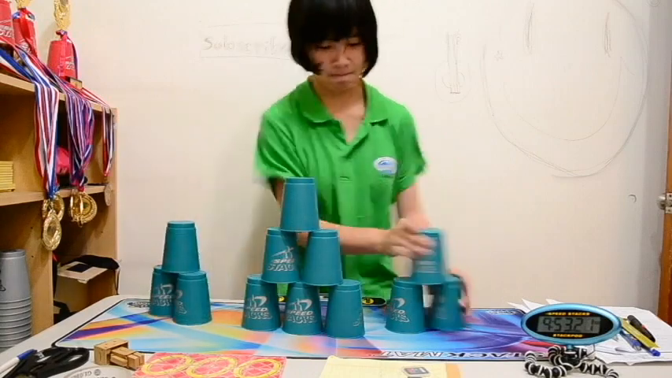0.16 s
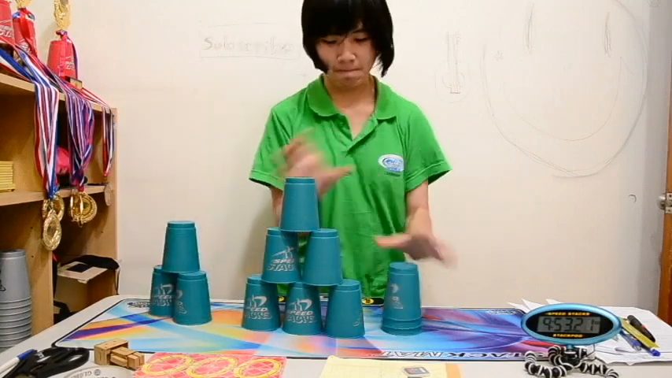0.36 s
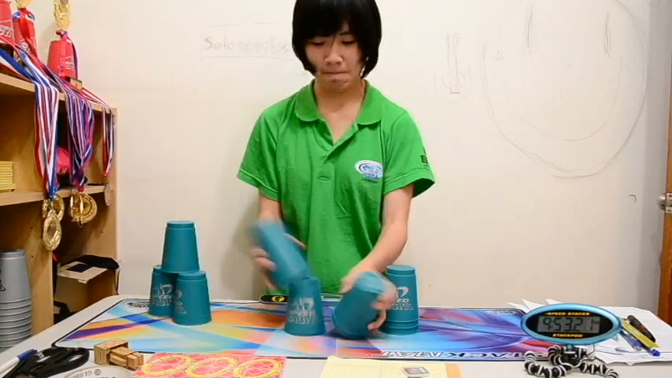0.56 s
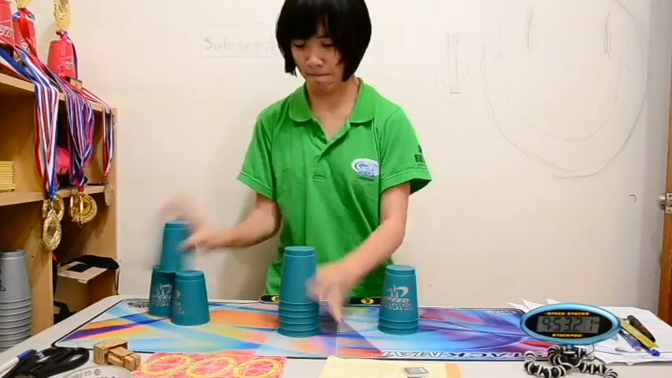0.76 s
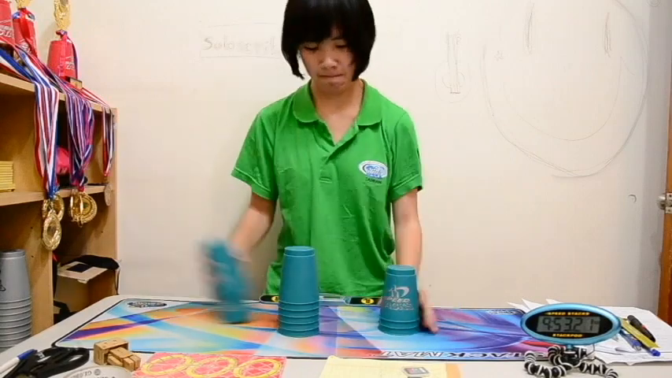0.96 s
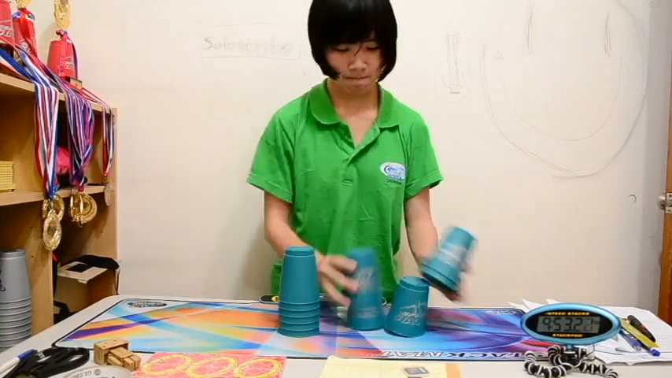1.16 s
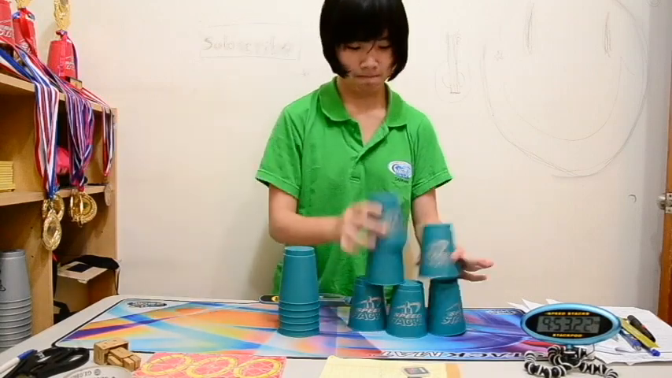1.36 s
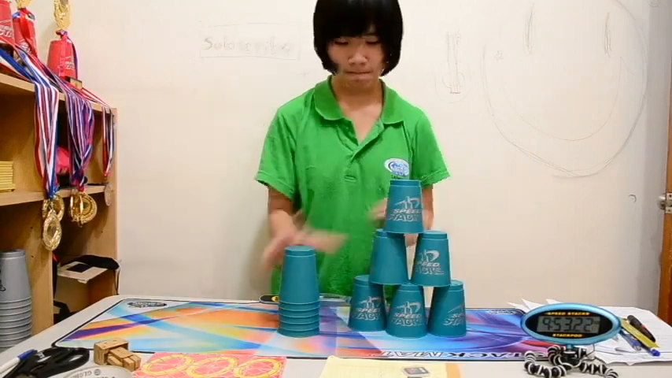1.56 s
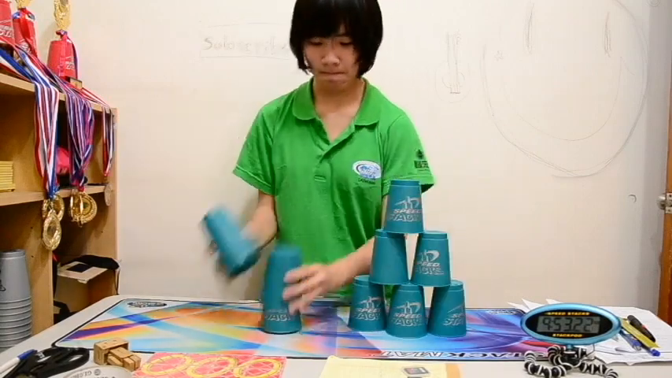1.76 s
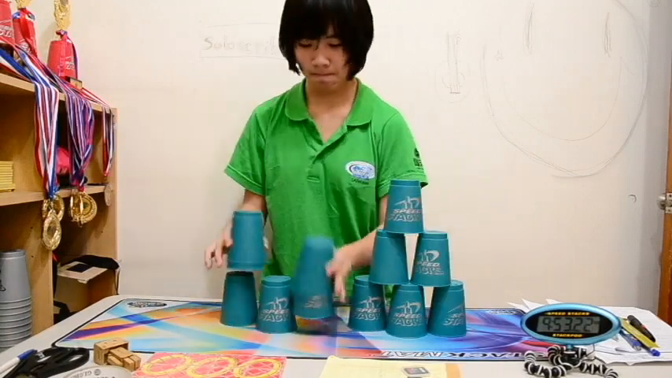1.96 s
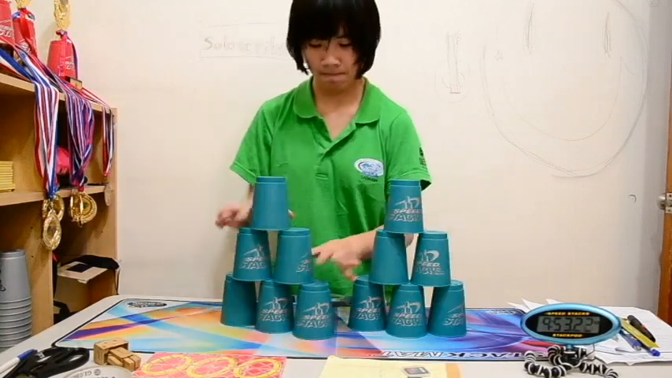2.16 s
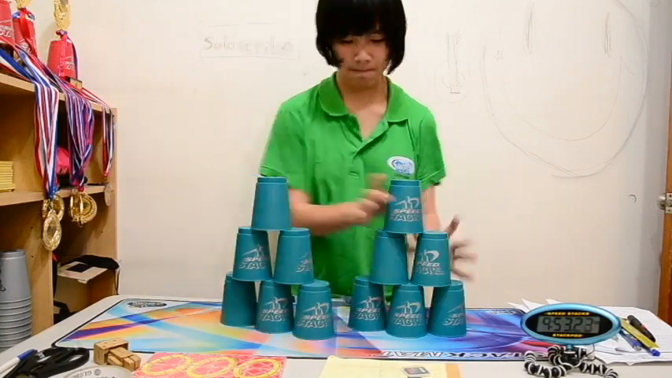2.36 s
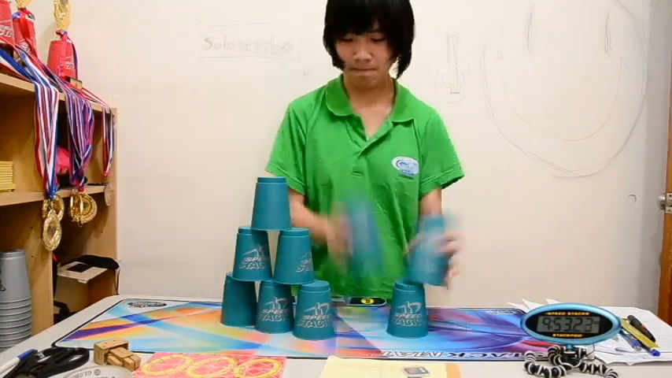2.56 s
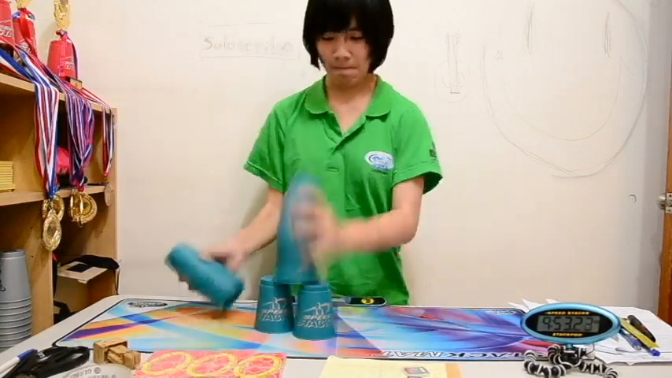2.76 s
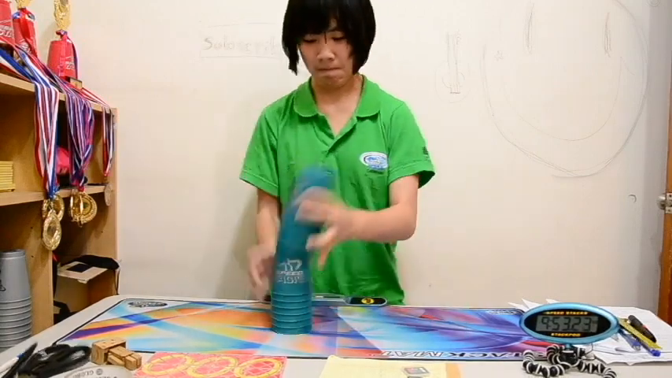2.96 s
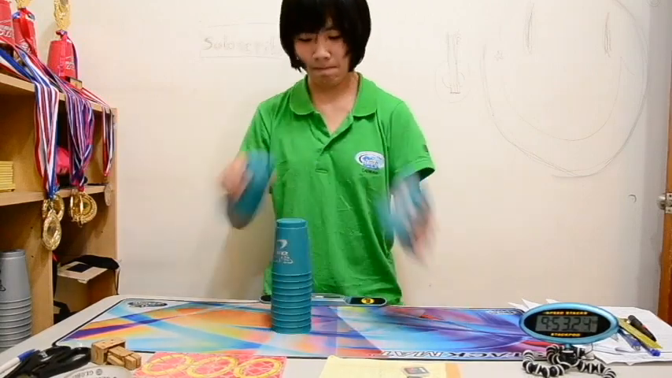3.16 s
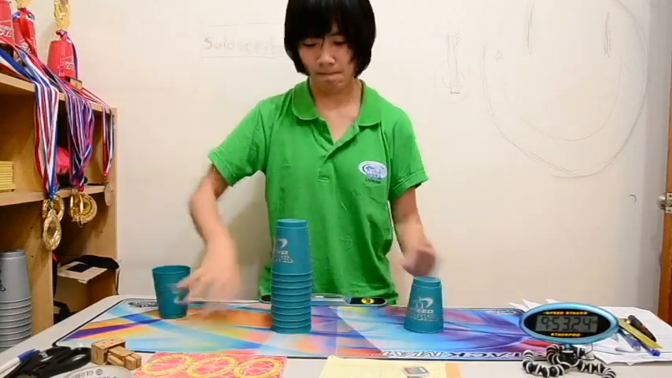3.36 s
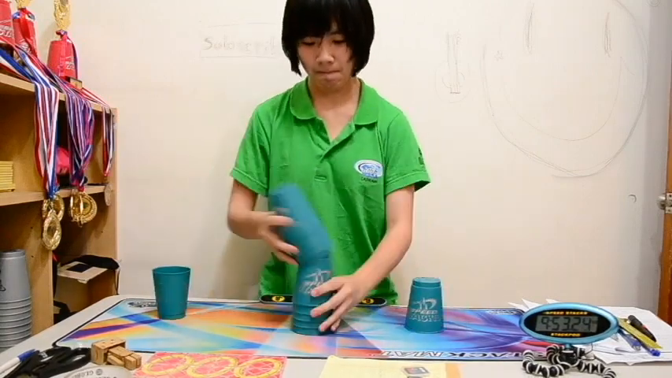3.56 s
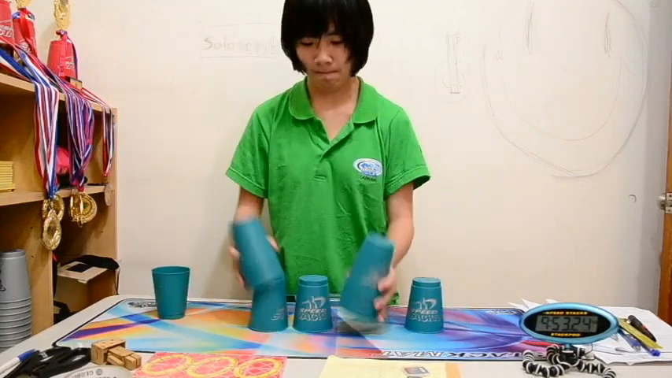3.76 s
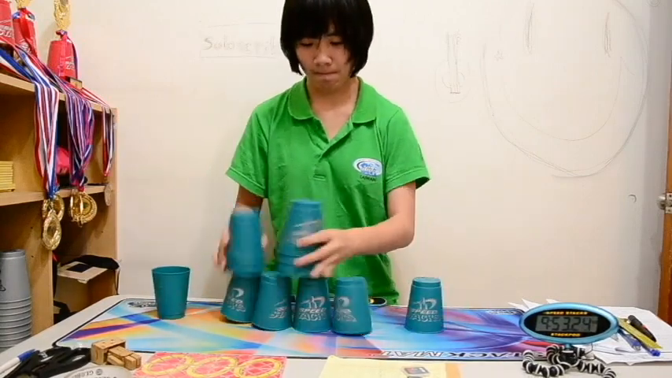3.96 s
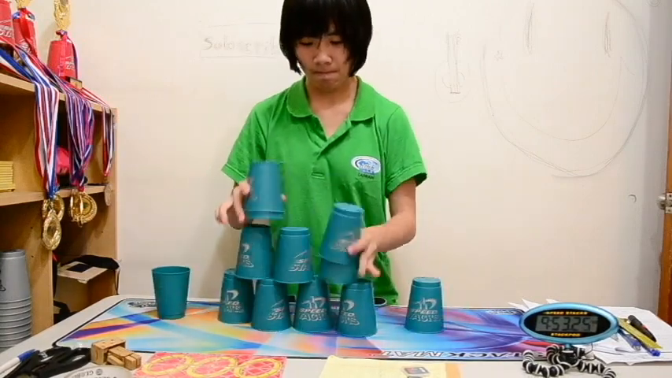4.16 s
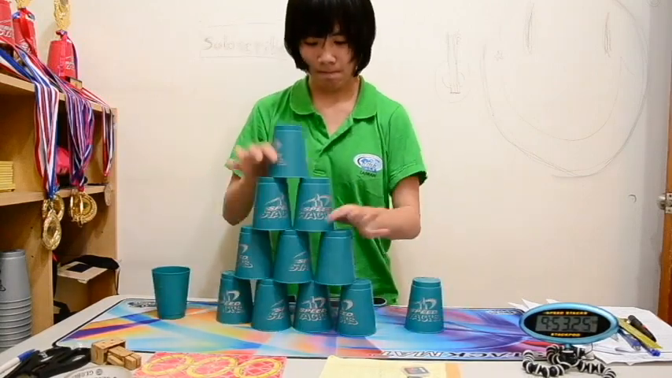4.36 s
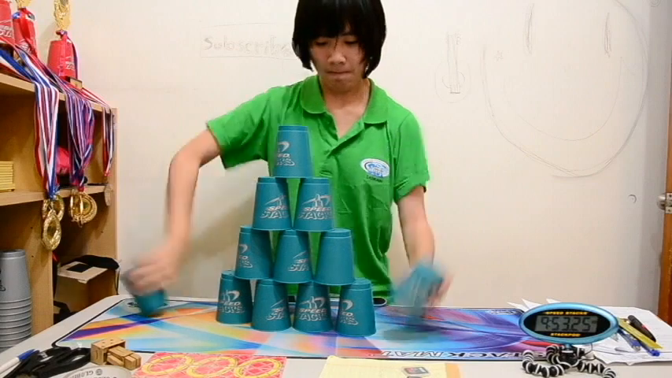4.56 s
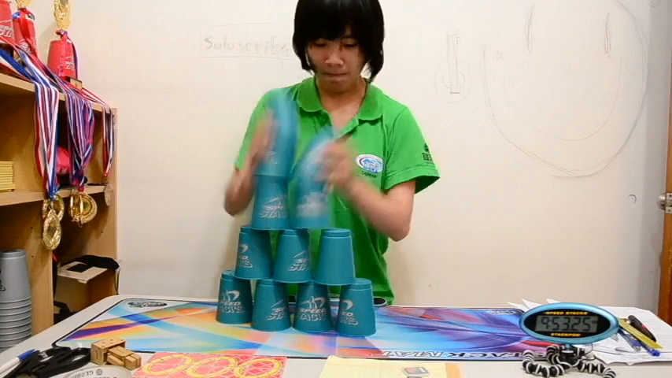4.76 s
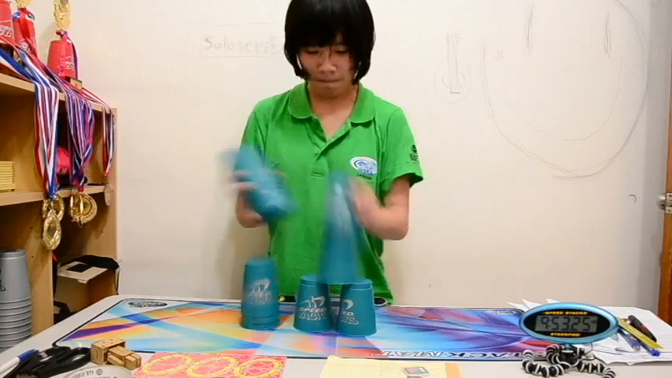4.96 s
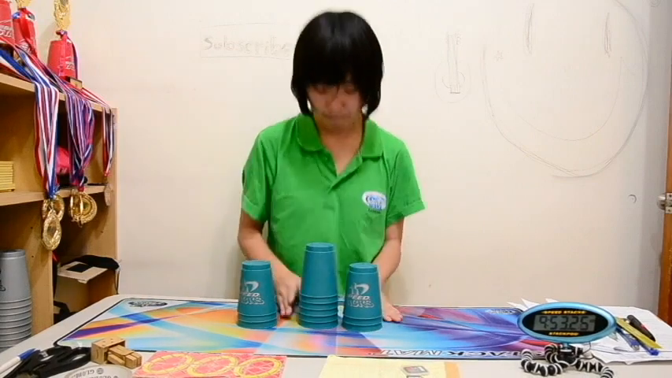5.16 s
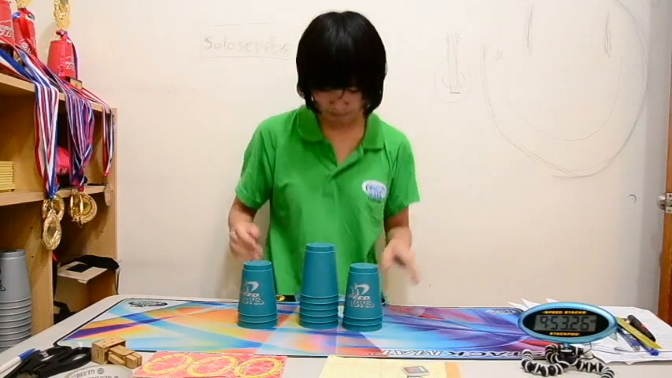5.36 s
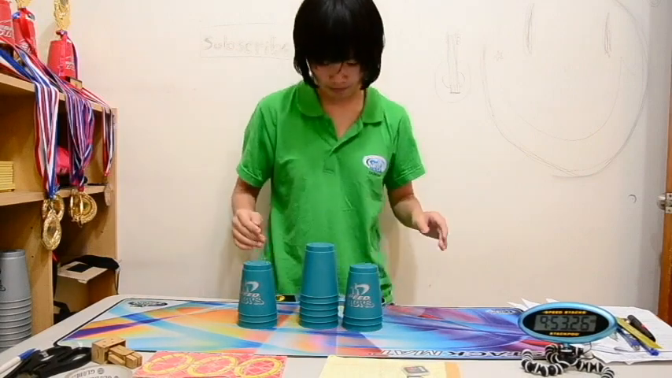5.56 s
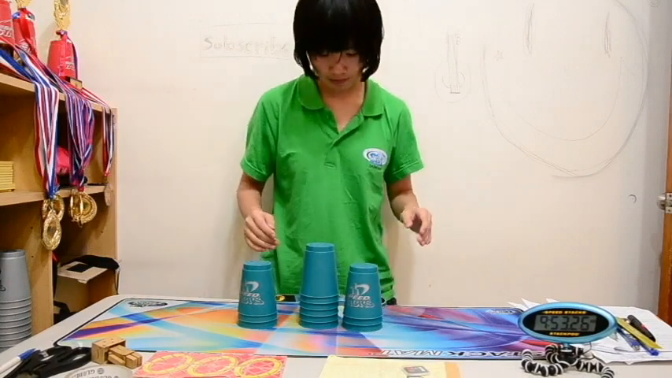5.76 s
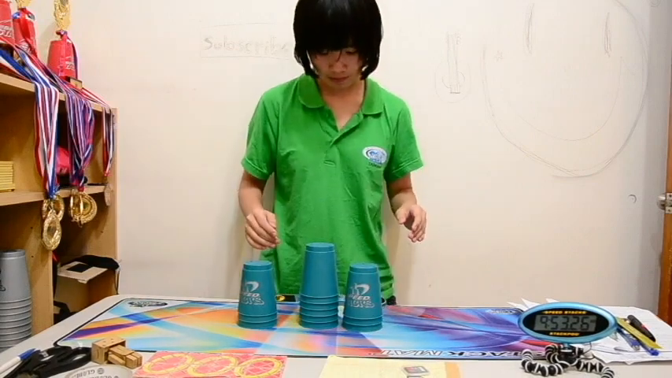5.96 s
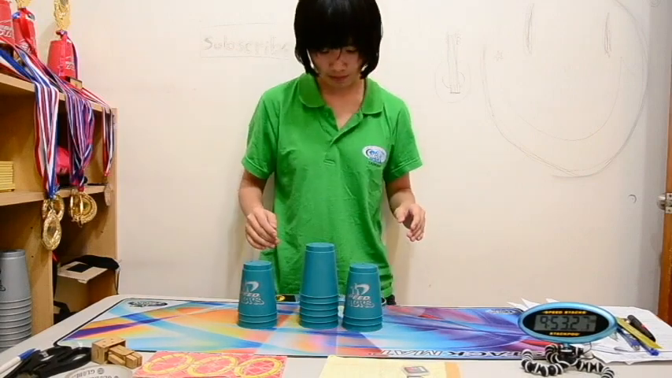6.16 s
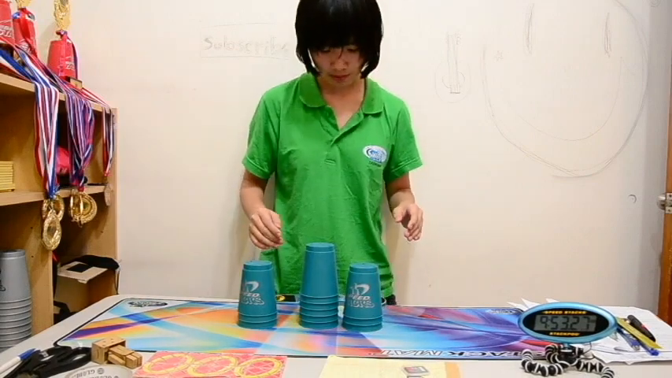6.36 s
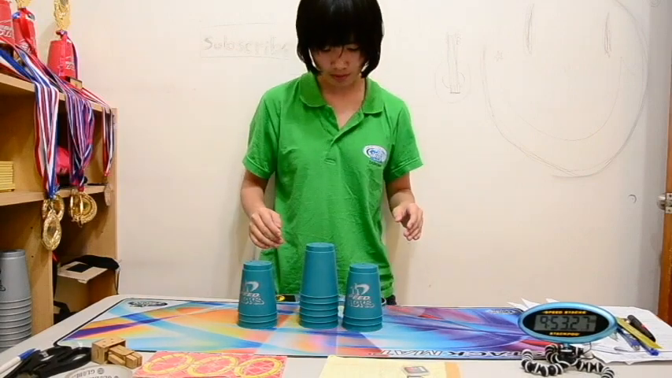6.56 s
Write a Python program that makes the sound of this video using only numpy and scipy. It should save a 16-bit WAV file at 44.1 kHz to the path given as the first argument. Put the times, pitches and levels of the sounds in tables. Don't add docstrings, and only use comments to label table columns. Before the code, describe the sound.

Hands stack light plastic cups very fast on a table mat in a small hard room. Crisp hollow pops come in quick runs while building; dense, sharp rattling clatter marks each take-down, with deeper knocks as whole stacks land. A last collapse ends with a slap on the table and a faint metallic ring, then quiet room tone. Close small camera microphone, boxy, clipping slightly.

```python
import sys
import numpy as np
from scipy import signal
from scipy.fft import rfft, irfft, next_fast_len
from scipy.io import wavfile
from scipy.ndimage import uniform_filter1d

SR = 44100
rng = np.random.default_rng(int(sys.argv[2]) if len(sys.argv) > 2 else 0)


def generate_wav(sig):
    pcm = np.round(np.clip(np.atleast_2d(sig).T, -1, 1) * 32767).astype(np.int16)
    wavfile.write(sys.argv[1], SR, pcm)


def volts_from_decibels(level):
    exponent = np.asarray(level, float) / 20
    return 10 ** exponent


N = 291041


def unit(x):
    return x / np.sqrt(np.mean(x ** 2) + 1e-20)


def along(points, hz):
    point_hz, value = np.transpose(points)
    return np.interp(np.log(hz + 1), np.log(point_hz + 1), value)


def filtered(x, response):
    size = next_fast_len(N + SR // 2)
    hz = np.fft.rfftfreq(size, 1 / SR)
    return irfft(rfft(x, size) * response(hz), size)[:N]


def resonances(modes):
    def response(hz):
        total = 0
        for k, (pitch, width, db) in enumerate(modes):
            damping = 1j * hz * width
            mode = volts_from_decibels(db) * damping / (pitch * pitch - hz * hz + damping)
            total = total + (-1) ** k * mode
        return total
    return response


def causal(points):
    def response(hz):
        cepstrum = irfft(np.log(volts_from_decibels(along(points, hz))))
        half = len(cepstrum) // 2
        cepstrum[1:half] *= 2
        cepstrum[half + 1:] = 0
        return np.exp(rfft(cepstrum))
    return response


def place(times, shapes):
    first = np.round(np.clip(times, 0, None) * SR).astype(int)
    at = first[:, None] + np.arange(shapes.shape[1])
    return np.bincount(at.ravel(), shapes.ravel(), N + SR)[:N]


def bursts(times, db, t60, dust_db, tint_db):
    t = np.arange(1024) / SR
    shape = rng.standard_normal((len(times), len(t))) * volts_from_decibels(dust_db - 60 * t / t60)
    shape[:, 0] = 1
    spectrum = rfft(shape)
    tint = unit(uniform_filter1d(rng.standard_normal(spectrum.shape), size=30, axis=1))
    tinted = irfft(spectrum / np.abs(spectrum) * volts_from_decibels(tint_db * tint))
    return place(times, tinted * volts_from_decibels(-30 * t / t60) * volts_from_decibels(db)[:, None])


def pops(peaks, db, hz, length):
    t = np.arange(2048) / SR
    u = t / length[:, None]
    swell = (u / 2) ** 2 * np.exp(2 - u)
    tone = np.sin(2 * np.pi * hz[:, None] * t)
    return place(peaks - 2 * length, volts_from_decibels(db)[:, None] * swell * tone)


def rings(times, db, hz, t60, rise, size=2048):
    t = np.arange(size) / SR
    swell = (1 - np.exp(-t / rise[:, None])) ** 2
    fall = volts_from_decibels(db[:, None] - 60 * t / t60[:, None])
    return place(times - 2 * rise, fall * swell * np.sin(2 * np.pi * hz[:, None] * t))


def chatter(rate, spread_db):
    hit = rng.random(N) < rate / SR
    return hit * rng.choice([-1, 1], N) * volts_from_decibels(spread_db * rng.uniform(-0.73, 1, N))


# pitch_hz [Hz], level_db [dB per Hz]
HUSH = [(15, -45), (25, -22.5), (249, -6.5), (440, -7), (513, -4), (555, -6), (1270, -8), (1640, -10.5),
        (7940, -29), (10800, -42), (12000, -56.5), (15600, -76.5), (22000, -120)]
HUSH_DB = -63.5


def hush():
    noise = rng.standard_normal(N)
    return volts_from_decibels(HUSH_DB) * unit(filtered(noise, lambda hz: volts_from_decibels(along(HUSH, hz))))


# pitch_hz [Hz], width_hz [Hz], level_db [dB]
CUP_AIR = [(700, 347, -1), (773, 268, 1.5), (980, 233, -6.5)]
# pitch_hz [Hz], level_db [dB]
RIM = [(1200, -7.5), (2500, 6), (4000, 3), (6000, 0.5), (9000, -1), (16000, -13.5)]
# air_db [dB], rim_db [dB]
EARLIER = (-10.5, -36.5)


def earlier():
    blow = np.eye(1, N)[0]
    air_db, rim_db = EARLIER
    air = volts_from_decibels(air_db + 43.5) * filtered(blow, resonances(CUP_AIR))
    return air + volts_from_decibels(rim_db + 2) * filtered(blow, causal(RIM))


# pitch_hz [Hz], t60_s (time to fall 60 dB) [s]
ROOM = [(100, 0.43), (400, 0.28), (1000, 0.24), (3000, 0.27), (9000, 0.24)]
LATE_DB, LATE_SLOWER = -25, 2.36
FIRST_WALL_S = 0.0014


def room(x, count=9):
    noise = rng.standard_normal((count, SR * 3 // 4))
    hz, t, z = signal.stft(noise, SR, nperseg=256)
    fall_db = -60 * t / along(ROOM, hz)[:, None]
    fall = volts_from_decibels(fall_db) + volts_from_decibels(LATE_DB + fall_db / LATE_SLOWER)
    tails = signal.istft(z * fall, SR, nperseg=256)[1]
    tails = tails * (1 - np.exp(-np.arange(tails.shape[1]) / SR / FIRST_WALL_S))
    stretch = np.arange(N) // 1024 % count
    total = np.zeros(N)
    for k, tail in enumerate(tails):
        share = np.sqrt(np.abs(uniform_filter1d(1. * (stretch == k), size=256)))
        total += signal.fftconvolve(x * share, tail / np.linalg.norm(tail))[:N]
    return total


# pitch_hz [Hz], width_hz [Hz], level_db [dB]
WALL = [(1550, 900, 11.5), (2080, 520, 35), (2840, 360, 5.5)]
# pitch_hz [Hz], width_hz [Hz], level_db [dB]
BOOM = [(59.7, 45, -11.5), (129.7, 2.4, -3)]
SLIDE_STARTS = [0, .19, .44, .755, .962, 1.30, 1.665, 1.90, 2.064, 2.44, 2.611, 2.718, 2.944, 3.296, 3.512,
                3.766, 4.035, 4.217, 4.575, 4.785, 5.002, 1.228, 2.416, 3.474, 3.655]
# length_s [s], air_db [dB], chatter_db [dB], table_boom_db [dB]
SLIDES = [(0.4, -48, -43, -50), (0.47, -25.5, -43, -55.5), (0.3, -20, -48.5, -33.5),
          (0.28, -23.5, -41, -41), (0.16, -38.5, -60, -45.5), (0.24, -26.5, -38, -45),
          (0.064, -32.5, -46.5, -44.5), (0.05, -23, -43, -35.5), (0.15, -23, -29.5, -51.5),
          (0.3, -22.5, -31.5, -43.5), (0.0407, -18.5, -19, -43), (0.2, -14.5, -23.5, -28.5),
          (0.12, -15, -19.5, -31.5), (0.052, -32.5, -39.5, -29), (0.073, -28.5, -38, -40),
          (0.045, -25.5, -29.5, -30.5), (0.27, -22, -44.5, -53.5), (0.31, -35.5, -44, -56.5),
          (0.016, -26, -40, -30.5), (0.2, -17, -26.5, -39.5), (0.16, -15.5, -24, -31.5),
          (0.04, -44.5, -67, -46), (0.03, -37, -53, -56.5), (0.04, -36.5, -45.5, -57),
          (0.05, -63, -69, -46)]
GRIP_S, LET_GO_S = 0.0033, 0.039


def slide():
    length, air_db, chatter_db, boom_db = np.transpose(SLIDES)
    t = np.arange(N) / SR - np.array(SLIDE_STARTS)[:, None]
    dying = np.exp(-np.clip(t - length[:, None], 0, None) / LET_GO_S)
    moving = np.clip(t / GRIP_S, 0, 1) * dying

    def level(db):
        return volts_from_decibels(db - 5.5) @ moving

    hollow = unit(filtered(chatter(400, spread_db=11.0), resonances(CUP_AIR)))
    contacts = chatter(370, spread_db=18.5)
    walls = unit(filtered(contacts, resonances(WALL)))
    rims = unit(filtered(contacts, causal(RIM)))
    rattle = unit(walls + 0.5 * rims)
    boom = unit(filtered(chatter(64, spread_db=-0.5), resonances(BOOM)))
    return level(air_db) * hollow + level(chatter_db) * rattle + level(boom_db) * boom


# pitch_hz [Hz], level_db [dB]
TABLE = [(95, -27), (150, -31.5), (185, -16.5), (300, -5.5), (450, 0.5), (600, 3.5), (800, 1), (1300, -4),
         (3000, -21), (9000, -38.5)]
# peak_s [s], level_db [dB], pitch_hz of the air
# [Hz], table_db [dB]
CUP_LANDINGS = [(0.19, -6.5, 975, -28), (0.219, 2, 958, -15.5), (0.306, -9.5, 1035, -19),
                (0.429, -6.5, 930, -17), (0.449, -5, 910, -9.5), (0.472, -9.5, 870, -9.5), (0.508, -5, 996, -13),
                (0.555, -12.5, 1070, -7), (0.6, -10, 1050, -9), (0.661, -12, 899, -5), (0.757, -4, 600, 1.5),
                (0.805, -6, 799, -6), (0.855, -6.5, 1133, -18.5), (0.96, -7, 663, -7.5),
                (0.988, -11.5, 794, -13.5), (2.442, -8.5, 980, -15), (2.468, -2, 963, -12.5),
                (2.513, -4.5, 1074, -4.5), (2.55, -6.5, 900, -4), (2.6075, -0.7, 848, -6.5),
                (2.716, -5, 983, -5), (2.738, -4.5, 626, -26.5), (2.777, -6.5, 634, -23), (2.809, -8, 890, -12),
                (3.002, -9, 798, -10), (3.065, -2.5, 744, -7.5), (4.785, 0, 943, -8.5), (4.822, -5, 910, -5),
                (4.87, -12, 560, -1), (5.0005, 1.5, 934, -10),
                (0.029, -15, 980, -23.5), (0.184, -12, 850, -14.5), (0.249, -12.5, 950, -12),
               (1.073, -26, 600, -22), (1.233, -42.5, 805, 3), (1.299, -18, 650, -12),
               (1.313, -19, 640, -1), (1.366, -13.5, 1003, -5), (1.387, -9.5, 1034, -12.5),
               (1.434, -2.5, 1045, -8), (1.449, -7.5, 870, -9.5), (1.489, -1.5, 977, -9),
               (1.561, -15, 900, -19.5), (1.716, -19.5, 576, -11.5), (1.727, -16, 510, -2),
               (1.852, -27.5, 550, -10), (1.878, -17.5, 524, -18), (1.898, -21.5, 735, -0.5),
               (1.912, -2.5, 773, -7.5), (2.065, -11.5, 1020, -3.5), (2.087, -11, 975, -7.5),
               (2.121, -15, 550, 9), (2.181, -1, 910, -10), (2.201, -1, 947, -21.5),
               (2.241, -12, 1040, -21.5), (2.265, -35.5, 953, -19.5), (2.4309, -15, 813, -12),
               (2.945, -13, 712, 1),
                (3.102, -10, 706, -18), (3.2935, -3.5, 638, -7.5), (3.301, -7, 653, -9), (3.309, -8, 650, -2),
              (3.32, -27.5, 740, 8.5), (3.513, -17.5, 1154, -4.5), (3.582, -32, 535, 13.5),
              (3.742, -28, 515, -1.5), (3.764, -14, 530, 1), (3.858, -21, 560, -6), (3.874, -5, 960, -8.5),
              (3.894, -12.5, 964, -14), (4.034, -4.5, 980, -0.5), (4.119, -7.5, 954, -13),
              (4.15, -9.5, 980, -19.5), (4.18, -11.5, 930, -17), (4.215, -5.5, 600, -17.5),
              (4.231, -2, 986, -8), (4.288, -7, 1096, -12.5), (4.3075, -3.5, 950, -16.5),
              (4.352, -0.5, 993, -8), (4.364, -0.5, 1005, -11), (4.402, 3.5, 975, -12.5),
              (4.4241, -2.5, 1000, -24.5), (4.537, -28, 500, -0.6), (4.597, -21, 950, 2.5),
              (4.624, -23, 700, -4.5), (5.084, -8, 953, -7), (5.104, -19.5, 1050, -12.5),
              (5.194, -20.5, 690, 1.5),
                (0.373, -18.5, 880, -19), (0.433, -7.5, 960, -13.5), (0.5175, -2.5, 877, -12.5),
            (0.61, -17, 1030, -15.5), (0.678, -9.5, 1030, -15), (0.778, -10, 887, -12.5),
            (0.785, -12, 665, -17), (0.837, -7, 940, -14), (0.978, -3, 740, -12), (1.0, -16, 820, -10.5),
            (1.013, -18, 770, -10), (1.441, -8, 810, -20.5), (1.467, -12, 980, -12),
            (1.497, -1, 1040, -8.5), (1.511, -7, 992, -16), (1.545, -16.5, 1000, -16.5),
            (1.929, -10, 720, -13.5), (2.131, -5, 1060, -16.5), (2.154, -6, 1050, -10.5),
            (2.224, -14.5, 983, -8), (2.457, -4, 930, -17.5), (2.529, -11.5, 1190, -7.5),
            (2.626, -11, 814, -12), (2.79, -10.5, 1015, -8), (2.824, -11.5, 830, -13),
            (2.867, -19.5, 640, 1.5), (2.909, -26, 820, 0.5), (2.984, -14, 705, -22),
            (3.058, -19, 756, -19.5), (3.074, -28, 794, -13.5), (3.325, -10, 705, -6),
            (3.348, -20.5, 388, 11), (3.487, -35, 780, -13), (3.999, -20.5, 486, -7.5),
            (4.794, -11.5, 900, -18), (4.809, -7.5, 990, -14.5), (4.844, -4.5, 930, -12.5),
            (4.886, -12.5, 680, -14.5), (5.011, -10, 943, -15.5), (5.029, -14, 885, -15.5),
            (5.224, -26, 670, -8.5)]
LANDING_S, PEAK_LAG_S = 0.001198, 0.001223
TABLE_LEAD_S = 0.0016


def knocks():
    s, db, hz, table_db = np.transpose(CUP_LANDINGS)
    s = s + PEAK_LAG_S
    air = pops(s, db - 0.5, hz, np.full(len(s), LANDING_S))
    blows = bursts(s - TABLE_LEAD_S, db + table_db + 36.0, t60=0.04, dust_db=-11.5, tint_db=1.5)
    thump = filtered(blows, causal(TABLE))
    return air + thump + volts_from_decibels(-15.5) * filtered(blows, resonances(BOOM))


RIM_TOUCHES = [(0.1785, -27.5, -47.5, 2300), (0.217, -17, -33.5, 2140), (0.2562, -9.5, -32.5, 2140),
               (0.3033, -19, -11.5, 1770), (0.3713, -16.5, -19, 2600), (0.4447, -9, -15.5, 2220),
               (0.4611, -8.5, -12.5, 2490), (0.4741, -5.5, -4.5, 1780), (0.5084, -21, -9, 1470),
               (0.5558, -13.5, -32, 1780), (0.5972, -3.5, -3.5, 1900), (0.6571, -10.5, -10, 1840),
               (0.7334, -16, -34, 1460), (0.7565, -4.5, -1.5, 2050), (0.8234, -12, -14.5, 1490),
               (0.834, -3.5, -26.5, 2410), (0.8538, -2, -3.5, 2000), (0.8736, -25.5, -17.5, 1900),
               (0.9597, -5.5, -14, 1690), (1.0755, -24, -17, 1500), (4.78, -7, -16, 2130),
               (4.8004, -9.5, -18, 2370), (4.81, -7, -10, 2320), (4.8228, -12, -16, 1570),
               (4.8417, -5.5, -9, 1960), (4.8665, -5.5, -6, 1580), (4.9052, -20, -22, 1530),
               (5.0002, -6.5, -10.5, 1400), (5.0771, -12.5, -9.5, 1460), (5.1005, -10.5, -7.5, 1540),
               (1.091, -31.5, -21, 1520), (0.107, -34, -32, 3080), (0.355, -21, -37, 2710),
               (2.429, -29, -48, 2200), (2.4464, -24.5, -40, 1610), (2.461, -19.5, -37, 1380),
               (2.47, -8, -33, 2760), (2.4951, -10, -21, 3240), (2.5121, -3, -7, 1850),
               (2.5331, -10.5, -6, 2600), (2.612, -6, -18, 2890), (2.626, -9, -10, 1850),
               (2.714, -11.5, -13, 2170), (2.7233, -7, -22, 1360), (2.7383, -6, -13, 1870),
               (2.7563, -4.5, -10, 1570), (2.7812, -9.5, -10.5, 1500), (2.8239, -10, -10, 1480),
               (2.8398, -10.5, -13, 1730), (2.9411, -10.5, -10.5, 1800), (2.9859, -10.5, -10, 1520),
               (3.0234, -15.5, -13, 1670), (3.053, -13.5, -14, 1450), (3.1318, -32, -21, 1430),
               (3.599, -36, -32, 1600), (3.315, -19.5, -27, 1380), (3.482, -35, -43, 1350),
               (3.5096, -21.5, -15, 1850), (3.5816, -25, -16.5, 1600),
               (1.2276, -33, -42, 2080), (1.287, -27.5, -36, 2730), (1.309, -17.5, -48, 2740),
              (1.3634, -22, -41, 1390), (1.4318, -15.5, -26.5, 1520), (1.4889, -19.5, -18.5, 2350),
              (1.6606, -34, -43, 1750), (1.738, -31.5, -24.5, 1440), (1.828, -36, -58.5, 1430),
              (1.897, -24.5, -43.5, 1510), (1.9119, -17.5, -15, 1930), (1.9216, -15.5, -9, 1900),
              (2.0606, -26, -32, 1380), (2.1108, -20.5, -23, 2220), (2.1197, -11, -18.5, 2410),
              (2.182, -16.5, -15, 1770), (3.7621, -17, -16.5, 2880), (3.8747, -20.5, -28, 1880),
              (3.932, -20.5, -34, 1860), (3.9875, -24.5, -50, 2410), (4.032, -13.5, -24, 2200),
              (4.108, -30.5, -30, 2200), (4.1465, -36, -55, 1380), (4.178, -33.5, -36, 2400),
              (4.216, -12, -11, 1450), (4.2293, -17.5, -17, 2400), (4.352, -17, -23.5, 2500),
              (4.4006, -10, -13.5, 2300), (4.5732, -26.5, -45.5, 1350), (4.593, -23, -33.5, 1500),
               (0.236, -18.5, -37, 1360), (0.49, -11, -16.5, 2060), (0.499, -17.5, -9, 1490),
              (0.516, -23, -25, 1380), (0.6092, -19.5, -18, 1935), (0.6194, -23.5, -21.5, 2250),
              (0.6654, -21.5, -18.5, 1560), (0.679, -15, -13.5, 1300), (0.77, -22.5, -7.5, 1650),
              (0.789, -22.5, -19.5, 2140), (0.8638, -19.5, -15, 2080), (0.881, -22, -15, 1540),
              (0.909, -23.5, -18, 2030), (0.9629, -26.5, -13, 1670), (1.454, -20, -23.5, 1640),
              (1.4978, -21.5, -37, 1380), (1.7258, -22, -31, 1920), (1.104, -37.5, -36, 1480),
              (1.114, -37, -31.5, 1600), (1.8764, -36.5, -40, 2320), (2.085, -23.5, -29.5, 1950),
              (2.15, -21.5, -21.5, 1300), (2.5544, -17, -13, 1920), (2.64, -27, -19.5, 1930),
              (2.7915, -10.5, -13, 1680), (2.868, -27, -23, 1697), (3.001, -15, -17, 2250),
              (3.3106, -27.5, -21.5, 1210), (3.5197, -28.5, -21, 1550), (3.755, -33.5, -34, 1270),
              (4.0163, -28.5, -25.5, 1430), (4.784, -10.5, -12.5, 2230), (4.8552, -13.5, -6.5, 1890),
              (4.88, -23, -11.5, 1460), (4.888, -17, -26.5, 1530), (5.0217, -11, -17.5, 1590),
              (5.087, -23.5, -12, 1470), (5.109, -28, -15, 1550), (5.154, -35, -17, 1470),
               (.462, -31, -14.5, 3200), (.665, -30, -10, 3100), (0.873, -30, -12.5, 3550),
              (2.535, -31, -12.5, 3270), (3.328, -42, -19.5, 3620), (3.344, -45, -21, 2920),
              (4.813, -31, -9.5, 3100), (4.836, -29.5, -13, 3380), (4.875, -33, -11, 3400),
              (4.911, -32, -19, 2860)]
CONTACT_LAG_S = 0.0009
SCATTER_DB, SHARPER = 7, 1.1
TINT_DB = 4


def ticks():
    touches = RIM_TOUCHES
    s, db, wall_db, hz = np.transpose(touches)
    s = s + CONTACT_LAG_S
    dust_db = SCATTER_DB - SHARPER * np.clip(db + 12.5, 0, None)[:, None]
    clicks = bursts(s, db + 20, t60=0.032, dust_db=dust_db, tint_db=TINT_DB)
    wall = rings(s, wall_db + 12.0, hz, t60=14 / hz, rise=0.43 / hz)
    return filtered(clicks, causal(RIM)) + wall


# peak_s [s], level_db [dB], pitch_hz [Hz]
STACKS = [(0.178, -28.5, 288), (0.619, -17.5, 433), (0.76, -17.5, 490), (0.966, -16, 342),
          (1.299, -20.5, 338), (1.728, -23.5, 460), (2.075, -23.5, 388), (2.194, -17, 425),
          (2.447, -22.5, 480), (2.526, -14.5, 403), (2.606, -24.5, 450), (2.73, -27.5, 398),
          (2.793, -10.5, 380), (2.904, -14, 360), (2.945, -11, 467), (3.053, -21, 370), (3.296, -10.5, 394),
          (3.746, -22, 285), (3.861, -23, 403), (4.036, -26, 436), (4.239, -22, 440), (4.3, -23, 383),
          (4.356, -23, 474), (4.787, -22, 433), (5.003, -15.5, 486), (5.104, -10, 420)]
# start_s [s], level_db [dB]
THUDS = [(0.212, -47), (0.492, -36), (0.591, -48), (0.654, -42), (0.749, -34), (0.819, -46), (0.963, -51),
         (1.298, -46), (1.669, -50), (2.118, -45), (2.636, -49), (2.781, -30), (2.944, -37), (3.315, -38),
         (3.484, -57), (3.762, -50), (4.002, -48), (4.392, -49), (4.582, -56), (4.786, -50), (4.876, -31),
         (5.151, -44)]
STACK_LANDING_S = 0.0018
TOP_MODE_HZ, TOP_T60_S, TOP_RISE_S = 119.4, 0.43, 0.008


def stacks():
    s, db, hz = np.transpose(STACKS)
    low_pops = pops(s + 0.00314, db - 0.5, hz, np.full(len(s), STACK_LANDING_S))
    at, thud_db = np.transpose(THUDS)
    same = np.ones(len(at))
    top = rings(at + 2 * TOP_RISE_S, thud_db + 5.0, TOP_MODE_HZ * same, TOP_T60_S * same,
                TOP_RISE_S * same, size=12288)
    return low_pops + top


# pitch_hz [Hz], level_db [dB], t60_s [s]
TRINKET = (4100, 3, .6)
# start_s [s], level_db [dB]
HAND_SLAP = (5.22, 9)


def trinket(shake):
    hz, db, t60 = TRINKET
    slap_s, slap_db = HAND_SLAP
    shake = shake + place(np.array([slap_s]), volts_from_decibels([[slap_db]]))
    width_hz = np.log(1000) / np.pi / t60
    return filtered(shake, resonances([(hz, width_hz, db)]))


# pitch_hz [Hz], level_db [dB]
MICROPHONE = [(60, -23), (200, -1.5), (6500, -3), (7800, -7), (8700, -4), (10300, -8), (11300, -22),
              (12000, -42), (12700, -22.5), (13400, -16), (14600, -11), (15600, -19.5), (16000, -30.5)]
WET_DB = 1.5


def scene():
    cups = knocks() + stacks() + ticks() + slide()
    tail = volts_from_decibels(WET_DB) * room(cups + earlier())
    heard = filtered(cups + tail + trinket(cups), causal(MICROPHONE))
    return (volts_from_decibels(-2.5) * heard + hush())[None]


def top_cut(x):
    return signal.sosfilt(signal.butter(12, 16670, fs=SR, output="sos"), x)


def record(dry):
    top_hz, bass_hz = 16650, 28
    clipped = dry / (1 + np.abs(dry / 0.8) ** 10) ** (1 / 10)
    limited = filtered(clipped[0], lambda hz: (hz < top_hz) * 1j * hz / (bass_hz + 1j * hz))[None]
    return top_cut(limited)


dry = scene()
out = record(dry)
generate_wav(out)
```